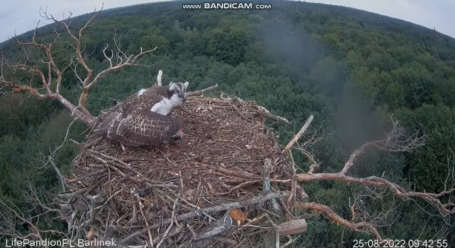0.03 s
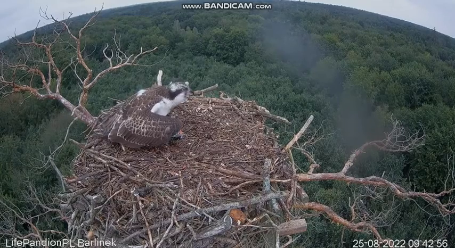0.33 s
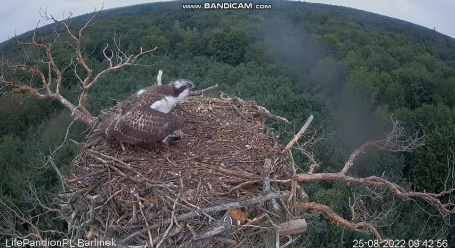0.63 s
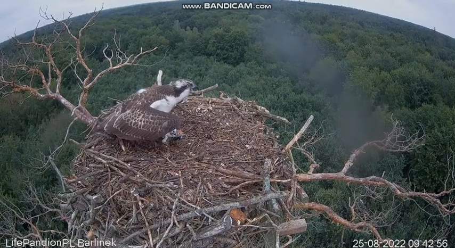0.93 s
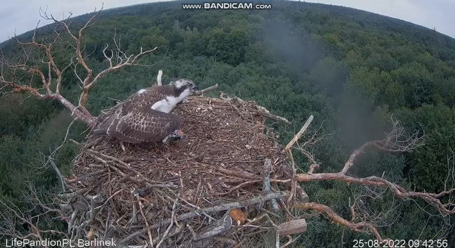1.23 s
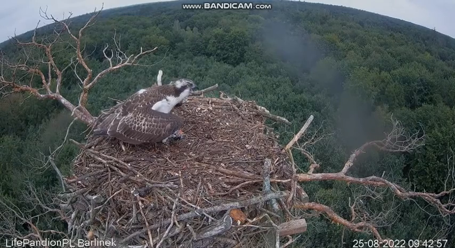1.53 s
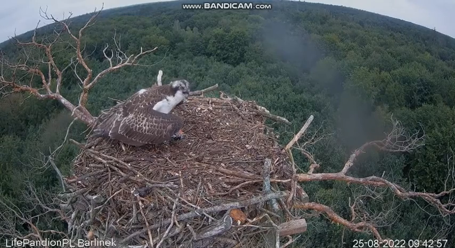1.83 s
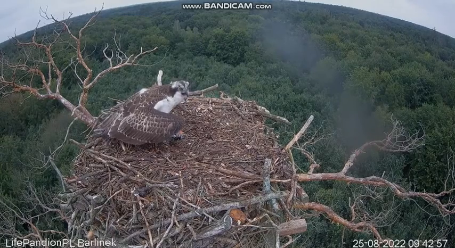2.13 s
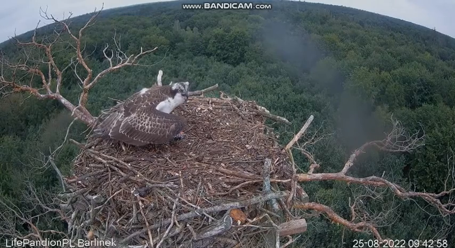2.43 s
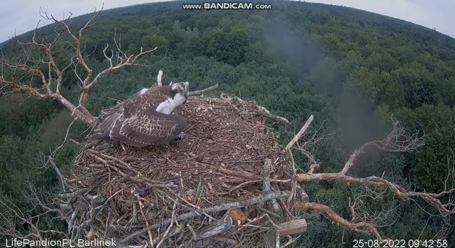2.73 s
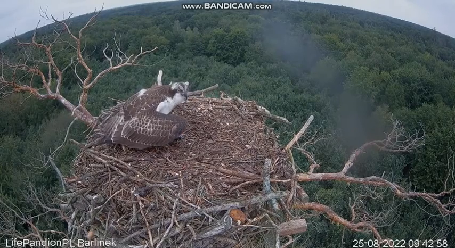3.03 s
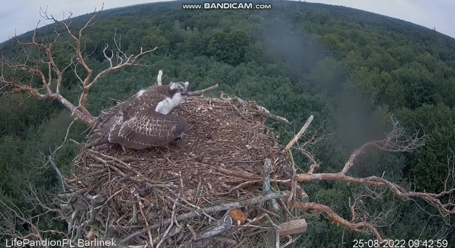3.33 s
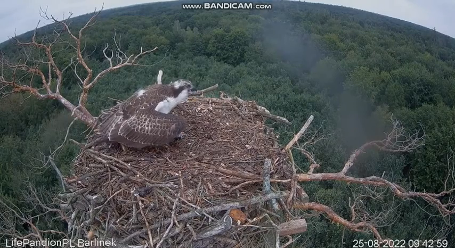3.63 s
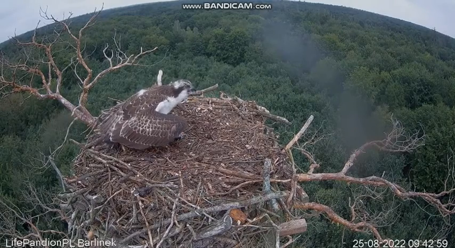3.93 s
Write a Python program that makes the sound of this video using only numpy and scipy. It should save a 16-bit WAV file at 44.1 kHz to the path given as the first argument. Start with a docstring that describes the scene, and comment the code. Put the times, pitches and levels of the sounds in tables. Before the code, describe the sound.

An osprey yelps loudly and repeatedly in shrill whistles over faint wind and hum.

```python
"""Light air rumbles over a faint hum as an osprey, close by on its nest above a forest, yelps 13 times.
Each yelp opens with a tick that rings the throat, then slides up as a clear whistle. It breaks into a
shrill upper register, where a second, unsteady voice mixes with the first and makes it rasp, then drops
back and slides down. The nest reflects the sound at once; the forest answers faintly afterwards.
Near the end, the eleventh yelp starts with a long, swelling whistle."""
import sys
import numpy as np
from scipy import signal
from scipy.fft import rfft, irfft
from scipy.io import wavfile

SR = 44100
rng = np.random.default_rng(int(sys.argv[2]) if len(sys.argv) > 2 else 0)


def materialize(psi):
    """Save the field psi as 16-bit PCM at rate SR to the path in sys.argv[1].

    A 1-D psi becomes a single channel; in a 2-D psi each row is a channel.
    """
    bounded = np.clip(np.atleast_2d(psi).T, -1, 1)
    quanta = np.round(bounded * 32767).astype(np.int16)
    wavfile.write(sys.argv[1], SR, quanta)


N = 176400
T = np.arange(N) / SR

# yelps: (tick [s], upward break [s], drop back [s], end [s], hiss [dB], second voice [dB], tick [dB])
YELP_EVENTS = [(-.03, 0.0, 0.092, .116, -56.5, -48, -44), (0.22, .249, .396, 0.42, -60.5, -47, -46.5),
               (0.534, .567, 0.69, .704, -66, -53, -46), (.787, 0.816, 0.91, 0.92, -65, -59, -44),
               (1.004, 1.033, 1.135, 1.154, -64, -54.5, -44.5),
               (1.263, 1.301, 1.376, 1.401, -61, -56, -45.5), (1.483, 1.515, 1.674, 1.689, -61, -53.5, -45),
               (1.785, 1.811, 1.886, 1.909, -54, -55, -43), (2.011, 2.037, 2.260, 2.274, -54, -52.5, -44),
               (2.399, 2.430, 2.611, 2.63, -54.5, -50.5, -45), (2.966, 3.145, 3.34, 3.359, -56, -48, -54),
               (3.472, 3.504, 3.586, 3.623, -63.5, -49.5, -48),
               (3.688, 3.718, 3.897, 3.922, -61.5, -52, -47)]
# whistled slides into and out of a yelp: (share of the slide [0-1], pitch [Hz], level [dB])
RISING_SLIDE = [(0, 1977, -76), (.2, 2026, -60), (.36, 2146, -50.5), (.45, 2640, -45.5), (.8, 2793, -43),
                (1, 2916, -44)]
FALLING_SLIDE = [(0, 2890, -44), (.35, 2725, -42.5), (.76, 2500, -52), (.85, 2089, -62.5), (1, 1900, -65.5)]
# the long opening whistle: (time [s], pitch [Hz], level [dB])
SWELLING_SLIDE = [(2.975, 2183, -80.5), (2.981, 2362, -53), (3.0, 2557, -47.5), (3.03, 2691, -43.5),
                  (3.085, 2701, -43.5), (3.14, 2797, -41), (3.145, 2863, -46)]
# whistle overtones against the fundamental: (frequency [Hz], gain [dB])
OVERTONE_GAINS = [(4000, -17.5), (4800, -16.5), (5350, -5.5), (5750, -16), (7000, -36.5), (8000, -21.5),
                  (8800, -42)]
# quick tremble of the whistle: (rate [Hz], relative density [dB])
FLUTTER_SPECTRUM = [(250, -25), (450, -14.5), (650, 0.5), (850, -2), (1100, -20), (2000, -39)]
# upper voice, one curve per yelp: (time [s], pitch [Hz], level [dB])
UPPER_CURVES = [
    [(0.004, 3521, -47), (0.054, 3582, -42.5), (0.091, 3594, -42.5)],
    [(0.255, 3608, -44.5), (0.275, 3605, -41), (0.305, 3503, -44.5), (0.385, 3670, -48)],
    [(0.57, 3650, -49.5), (0.596, 3605, -45.5), (0.626, 3566, -48), (0.668, 3593, -45.5)],
    [(0.821, 3586, -46.5), (0.845, 3577, -42.5), (0.895, 3563, -47)],
    [(1.038, 3580, -48.5), (1.062, 3616, -44), (1.13, 3572, -48)],
    [(1.306, 3610, -45.5), (1.338, 3596, -45.5), (1.37, 3544, -49.5)],
    [(1.517, 3624, -47), (1.567, 3580, -47), (1.625, 3700, -46.5), (1.662, 3660, -45)],
    [(1.816, 3683, -43.5), (1.845, 3725, -41), (1.886, 3510, -45)],
    [(2.04, 3596, -42.5), (2.058, 3673, -40.5), (2.114, 3540, -45.5), (2.23, 3767, -42),
     (2.256, 3667, -41.5)],
    [(2.435, 3650, -44.5), (2.459, 3660, -42.5), (2.5, 3540, -47), (2.575, 3732, -42.5),
     (2.604, 3667, -42.5)],
    [(3.15, 3490, -48), (3.164, 3593, -50.5), (3.3, 3815, -42.5), (3.334, 3703, -41)],
    [(3.508, 3670, -48.5), (3.538, 3680, -48.5), (3.579, 3632, -48.5)],
    [(3.722, 3685, -46.5), (3.74, 3657, -43.5), (3.799, 3566, -48.5), (3.87, 3748, -45.5),
     (3.9, 3655, -44.5)],
]
# tones of the mixing voices: (multiple of upper [1], multiple of second [1], level against second [dB])
COMBINATION_TONES = [(-1, 2, -22), (2, -1, -12), (1, 1, -15), (0, 2, -22), (-2, 3, -32), (3, -2, -20)]
# turbulence in the throat, and its low resonance: (frequency [Hz], relative density [dB])
HISS_SPECTRUM = [(1500, -32), (2100, -9), (2500, 2.5), (3000, -3), (3400, -1), (4000, -3), (4500, 1),
                 (4950, -6.5), (5400, -1), (6400, 0), (6800, -16), (7400, -3.5), (7900, -12), (8800, -33.5)]
THROAT_SPECTRUM = [(300, -33), (900, -37.5), (1450, -12.5), (1850, -27), (2150, 8), (2400, -3),
                   (2700, -12.5), (3500, -35)]
# throat modes rung by the tick: (frequency [Hz], relative level [dB])
THROAT_MODES = [(220, -13.5), (1100, -15), (2300, -1.5), (4400, -18.5)]
# far forest murmur, and wind on the microphone: (frequency [Hz], relative density [dB])
MURMUR_SPECTRUM = [(25, 3.5), (120, -10), (400, -12), (500, -14), (800, -15.5), (1500, -20), (8800, -47)]
RUMBLE_SPECTRUM = [(20, -2), (50, 2.5), (100, -9.5), (200, -19.5), (500, -26), (1500, -69.5)]
# slow course of the wind rumble: (time [s], level [dB])
RUMBLE_ENVELOPE = [(0.0, -75.5), (.3, -83.5), (.8, -84.5), (1.4, -79.5), (2.1, -79), (2.6, -90),
                   (3.45, -88), (3.9, -81)]

BREAK_S, RELEASE_S = .0019, .004   # fade times at a register break and at a yelp's end


def shrill():
    """Nonlinear mixing: two voices in the upper register form combination tones, heard as a rasp."""
    sag_hz, sag_s = 130.5, .009   # the pitch gives way just before the drop back
    second_ratio, second_ceiling_db = .795, -49
    second_yield = 1.4   # dB lost for each dB that the upper voice gains
    hz, upper_db = in_time(sorted(tuple(row) for curve in UPPER_CURVES for row in curve))
    voiced, second_level, hiss_level = 0, 0, 0
    for _, up, down, _, hiss_db, second_db, _ in YELP_EVENTS:
        on = gate(up, down, BREAK_S)
        swing_db = second_yield * (np.average(upper_db, weights=on) - upper_db)
        hz = hz - (on > 0) * sag_hz * np.exp(-np.abs(T - down) / sag_s)
        voiced += on
        second_level += on * from_db(np.minimum(second_db + swing_db, second_ceiling_db))
        hiss_level += on * from_db(hiss_db)
    upper_phase = phase_of(hz, jitter_hz=16)
    second_phase = phase_of(second_ratio * hz, jitter_hz=54.93) + .25 * drift(320)   # uneven cycles
    octave = from_db(-14.5 + 1.5 * drift(45)) * np.cos(2 * upper_phase)
    steady = voiced * from_db(upper_db + .55 * drift(45)) * (np.cos(upper_phase) + octave)
    mixed = sum(from_db(db) * np.sin(m * upper_phase + n * second_phase)
                for m, n, db in COMBINATION_TONES)
    flicker = rms_one(from_db(3.5 * drift(110)))
    rasp = second_level * flicker * (np.cos(second_phase) + mixed)
    voice = saturate(np.sqrt(2) * (steady + rasp) + hiss_level * noise(HISS_SPECTRUM))
    throat_highpass = signal.butter(3, 1300, "high", fs=SR, output="sos")
    return signal.sosfilt(throat_highpass, voice) + voiced * from_db(-62) * noise(THROAT_SPECTRUM)


def saturate(x, peak_db=-33.5, order=6):
    """Saturation: the widest swings of the vibrating membranes are rounded off."""
    envelope = np.abs(signal.hilbert(x))
    return x / (1 + (envelope / from_db(peak_db)) ** order) ** (1 / order)


def whistle(flutter_rad=.083, long_lead_s=.1):
    """Phase modulation: a quick tremble adds sidebands to the gliding, harmonic lower register."""
    hz, level = np.full(N, 2.0 * RISING_SLIDE[0][1]), np.zeros(N)
    for tick, up, down, end, *_ in YELP_EVENTS:
        if up - tick > long_lead_s:
            rise = in_time(SWELLING_SLIDE)
        else:
            rise = in_time(RISING_SLIDE, (T - tick) / (up - tick))
        fall = in_time(FALLING_SLIDE, (T - down) / (end - down))
        for (pitch, db), on in ((rise, gate(tick, up, BREAK_S)), (fall, gate(down, end, RELEASE_S))):
            now = on > 0
            hz[now] = pitch[now]
            level[now] += on[now] * from_db(db[now])
    phase = phase_of(hz, jitter_hz=13)
    phase += flutter_rad * rms_one(noise(FLUTTER_SPECTRUM) * from_db(3 * drift(36)))
    overtones = sum(from_db(at_hz(OVERTONE_GAINS, k * hz)) * np.sin(k * phase) for k in (2, 3))
    breath = from_db(-26) * (noise(THROAT_SPECTRUM) + noise(HISS_SPECTRUM))
    return level * (np.sqrt(2) * (np.sin(phase) + overtones) + breath)


def ticks(decay_s=.00075):
    """Impulse response: a small pop rings the damped modes of the throat as it opens."""
    out = np.zeros(N)
    for tick, up, *_, tick_db in YELP_EVENTS:
        near = (T > tick) & (T < up)
        age = T[near] - tick
        fade = np.exp(-age / decay_s)
        ring = sum(from_db(tick_db + db) * np.sin(2 * np.pi * hz * age) for hz, db in THROAT_MODES)
        out[near] += 2 * fade * (1 - fade) * ring
    return out


def scatter(x, t60_s, build_s):
    """Reverberation: countless small reflections build up, then die away exponentially."""
    tail = rng.standard_normal(N) * from_db(-60 * T / t60_s) * (1 - np.exp(-T / build_s))
    return signal.fftconvolve(x, tail / np.linalg.norm(tail))[:N]


def wind():
    """Turbulence: light gusts on the microphone modulate a rumble over the far forest murmur."""
    murmur = from_db(-86) * noise(MURMUR_SPECTRUM)
    rumble = rms_one(noise(RUMBLE_SPECTRUM) * from_db(3.5 * drift(3.4)))
    return murmur + from_db(in_time(RUMBLE_ENVELOPE)[0]) * rumble


def hum():
    """Frequency modulation: a faint background tone wavers at random."""
    return from_db(-102) * np.sqrt(2) * np.sin(phase_of(398, jitter_hz=12, rate_hz=11))


def phase_of(hz, jitter_hz, rate_hz=400):
    """Phase is the time integral of frequency, here with random jitter."""
    return 2 * np.pi * np.cumsum(hz + jitter_hz * drift(rate_hz)) / SR


def noise(spectrum):
    """Spectral shaping colours white noise; rms 1."""
    gain = from_db(at_hz(spectrum, np.fft.rfftfreq(N, 1 / SR)))
    return rms_one(irfft(rfft(rng.standard_normal(N)) * gain, N))


def drift(rate_hz):
    """Low-pass filtering turns noise into a smooth fluctuation; rms 1."""
    pole = np.exp(-2 * np.pi * rate_hz / SR)
    return rms_one(signal.lfilter([1], [1, -2 * pole, pole * pole], rng.standard_normal(N + SR))[SR:])


def gate(start, stop, edge_s):
    """A window with raised-cosine edges."""
    return np.sin(np.pi / 2 * np.clip(np.minimum(T - start, stop - T) / edge_s + .5, 0, 1)) ** 2


def in_time(rows, t=T):
    """Linear interpolation of a curve's columns at every sample."""
    times, *columns = np.transpose(rows)
    return np.array([np.interp(t, times, column) for column in columns])


def at_hz(spectrum, hz):
    """Interpolation of a spectrum on a log-frequency axis."""
    frequencies, db = np.transpose(spectrum)
    return np.interp(np.log(np.maximum(hz, 1)), np.log(frequencies), db)


def from_db(db):
    """Amplitude ratio of a level."""
    return 10 ** (np.asarray(db) / 20)


def rms_one(x):
    """Normalisation to unit power."""
    return x / np.sqrt(np.mean(x ** 2) + 1e-20)


def scene():
    """Superposition: bird, reflections, wind and hum add at one point, alike in both channels."""
    bird = whistle() + shrill() + ticks()
    nest = from_db(-25.5) * scatter(bird, t60_s=.057, build_s=.00025)
    forest = from_db(-49) * scatter(bird, t60_s=2.1, build_s=.07)
    return np.tile(bird + nest + forest + wind() + hum(), (2, 1))


def record(dry, converter_hz=16000, edge_hz=7750, cutoff_hz=8900):
    """Aliasing: a slow converter mirrors the highest overtones; low-pass filters cut the top steeply."""
    mirrored = dry * (1 + 2 * np.cos(2 * np.pi * converter_hz * T))
    rounded = signal.sosfilt(signal.butter(20, edge_hz, fs=SR, output="sos"), mirrored)
    return signal.sosfilt(signal.ellip(10, .1, 80, cutoff_hz, fs=SR, output="sos"), rounded)


dry = scene()
out = record(dry)
materialize(out)
```